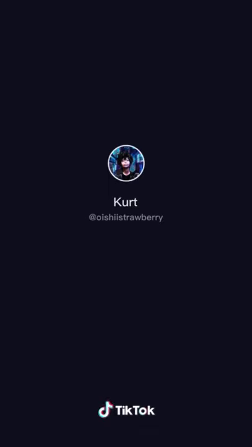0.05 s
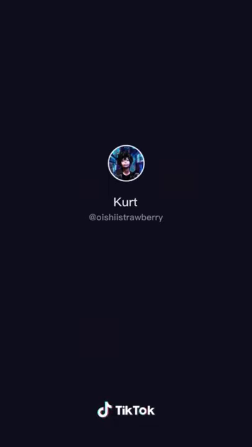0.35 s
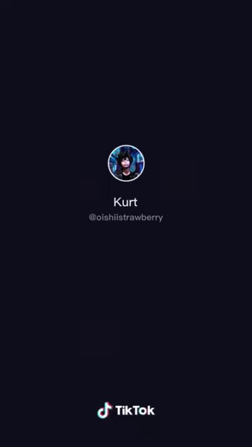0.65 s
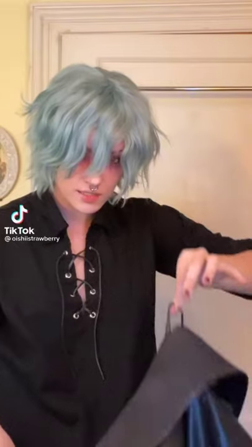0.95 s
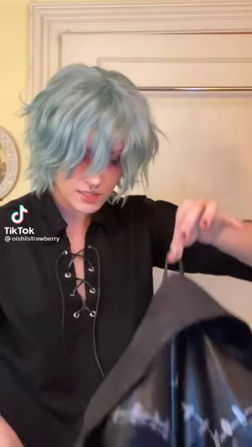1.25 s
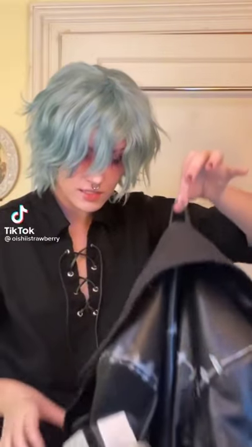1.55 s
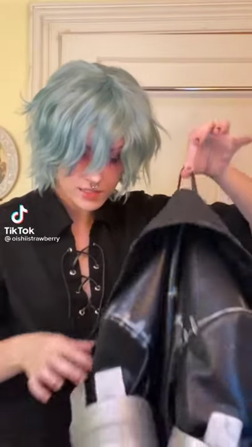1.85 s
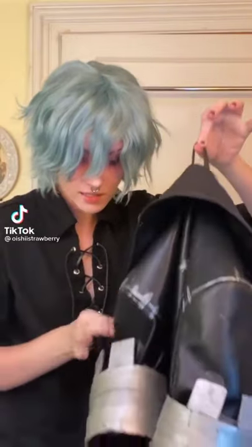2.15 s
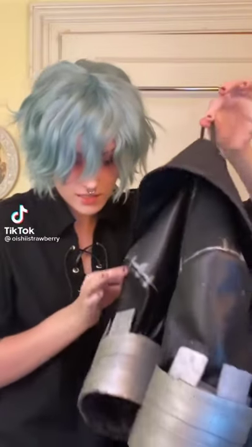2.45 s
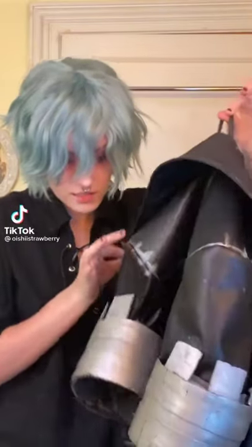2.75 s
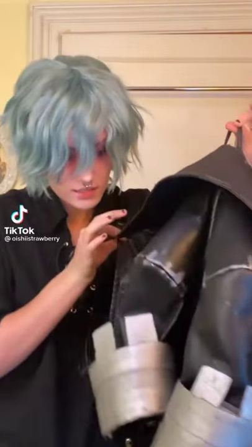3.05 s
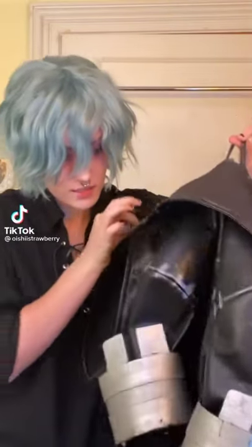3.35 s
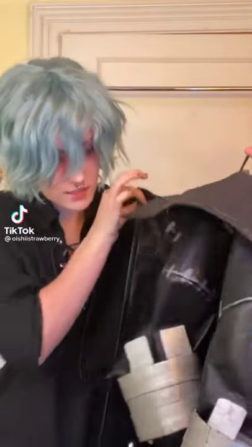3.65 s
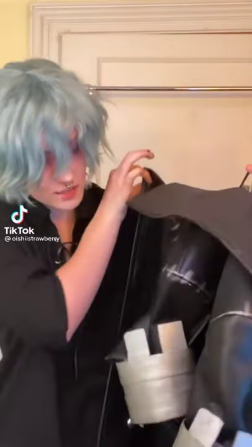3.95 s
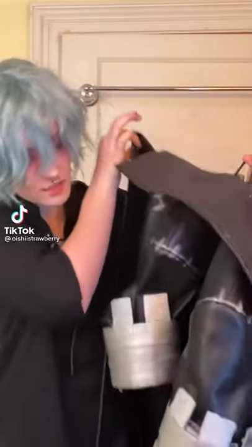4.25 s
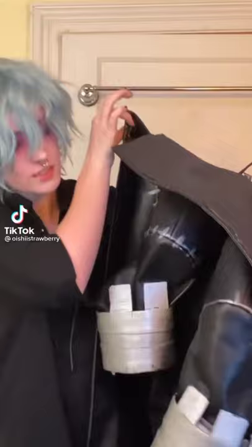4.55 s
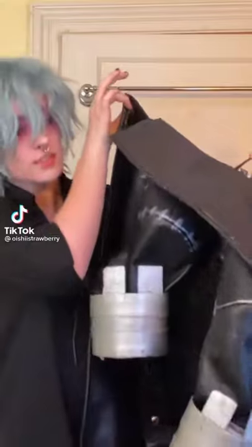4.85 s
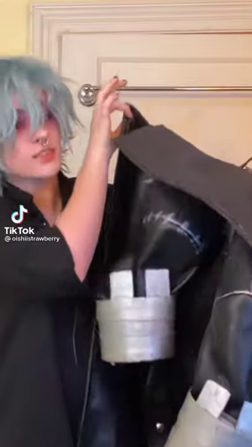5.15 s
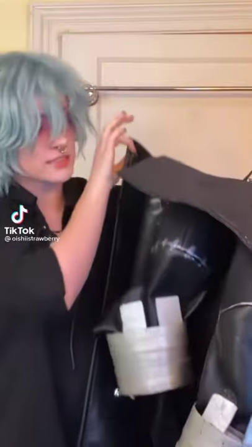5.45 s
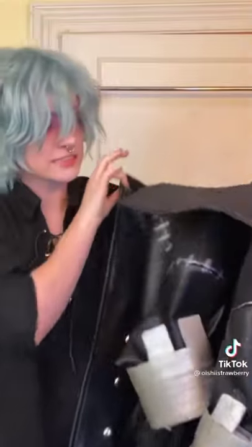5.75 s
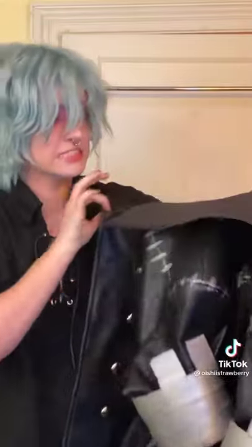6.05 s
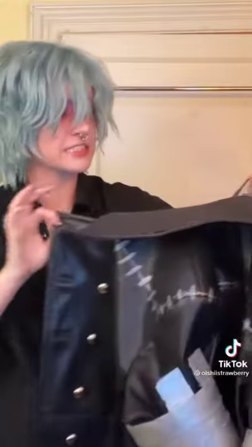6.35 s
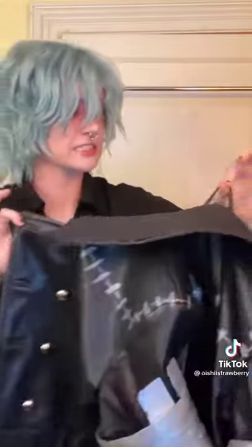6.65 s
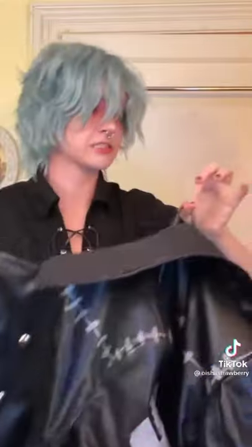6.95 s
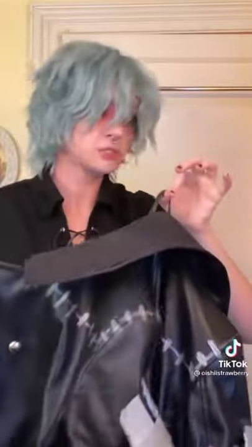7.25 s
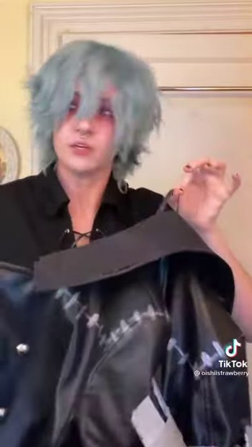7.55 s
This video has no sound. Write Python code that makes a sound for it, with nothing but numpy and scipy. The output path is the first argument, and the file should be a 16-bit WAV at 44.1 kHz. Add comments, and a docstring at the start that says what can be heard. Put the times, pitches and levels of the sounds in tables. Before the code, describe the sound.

After a brief silence and faint room rumble, a stiff coat is picked up with a heavy flap right by the microphone. Irregular dull flops and crisp snaps follow, mixed with clumps of crinkling and sliding hiss as the imitation leather is turned over. The handling becomes gentler toward the end until the coat settles. The room sounds small and fairly dry.

```python
"""A stiff imitation-leather coat on its hanger, close up in a small room. A faint room rumble fades in,
then at 0.84 s the coat is hoisted with a big dull flap and a hollow rumple. As it is turned about, large
panels flip over, taut creases snap and lesser panels buckle at random; between them the coated cloth
hisses as it slides over itself and tiny creases crackle. The rustle is brightest around 4 s, then
softens, and the coat settles with a last small flap near 7.4 s."""
import sys
import numpy as np
from scipy import signal
from scipy.fft import rfft, irfft
from scipy.io import wavfile
from scipy.ndimage import uniform_filter1d

SR = 44100
rng = np.random.default_rng(int(sys.argv[2]) if len(sys.argv) > 2 else 0)


def unload_audio(sound):
    """Save the sound as a 16-bit wav file, at the path given as the first command line argument."""
    columns = np.transpose(np.atleast_2d(sound))
    # keep every value between -1 and 1, then stretch to whole-number steps
    steps = np.round(np.clip(columns, -1, 1) * 32767)
    wavfile.write(sys.argv[1], SR, steps.astype(np.int16))


N = 335601
TIME = np.arange(N) / SR
GRAB_S, SETTLED_S = 0.84, 7.0  # the coat is taken up; its lesser panels stop buckling
HIT_SAMPLES, LEAD_S = 2048, 0.005  # length of one flap or snap; its pre-roll
HIT_TIME = TIME[:HIT_SAMPLES] - LEAD_S  # zero where the crease gives way

# Spectrum of the room bed, ahead of its fader: freq_hz, band_level_db
ROOM_SPECTRUM = [(25, -62), (50, -58.5), (200, -60.5), (6000, -73.5), (13000, -106)]
# Fader bringing the room bed in: time_s, gain_db
ROOM_FADE = [(.7, -120), (.76, -5.5), (.85, -3)]
# Stereo width of the coat: freq_hz, side_minus_mid_db
COAT_WIDTH = [(90, 0), (200, -14), (1000, -16), (2000, -12), (3500, -7.5), (6000, -3), (12000, -1.5)]
# Fader on the coat's treble above 11 kHz: time_s, gain_db
TREBLE_RIDE = [(1.0, -5.5), (1.7, -14), (2.1, -36), (2.6, 2), (3.6, 2.5), (4.8, 3), (5.7, -27), (7.5, -24)]
# Hollow swells as the coat is hoisted: time_s, level_db
RUMPLE_ENVELOPE = [(.84, -110), (.855, -21), (1.08, -41), (1.45, -25), (1.62, -60), (1.9, -110)]
# How hard the cloth slides and creases: time_s, body_db, hiss_db
RUSTLE_ENVELOPE = [(1.03, -37, -52), (1.36, -44, -41.5), (1.74, -37.5, -41), (2.13, -35, -40),
                   (2.45, -49, -51.5), (2.78, -46, -43.5), (3.02, -47, -49.5), (3.24, -40.5, -37.5),
                   (3.78, -35.5, -33.5), (3.96, -41, -38.5), (4.28, -35, -32), (4.65, -37.5, -39),
                   (5.02, -39, -41.5), (5.6, -39, -44), (5.97, -45, -51.5), (6.62, -43.5, -48),
                   (7.23, -54, -59.5), (7.6, -61.5, -63.5)]
# Tone of the rustle: freq_hz, band_gain_db
RUSTLE_EQ = [(86, -21.5), (200, -14), (300, -13.5), (500, -11), (1060, -10), (2000, -8.5), (3700, -4.5),
             (5600, -2), (13000, -5.5)]
# How the sheet radiates a flap or snap: freq_hz, gain_db
SHEET_EQ = [(130, 4.5), (200, 5.5), (330, 0), (520, -4), (750, 0.5), (1100, 5.5), (1500, 0.5), (3200, 1.85),
            (5600, 0.5), (8500, -4.5), (13000, -7)]
# Large panels flipping over, all dull: start_s, level_db, pitch_hz, crease_run_s
# (level is the hit's energy spread over 5 ms; pitch is the panel's lowest resonance)
PANEL_FLAPS = [(.847, -6.5, 224, 0.0032), (.859, -24, 370, 0.0024), (.875, -20, 390, 0.0019),
               (1.012, -15, 435, 0.0011), (1.023, -19, 290, 0.0038), (1.111, -18.5, 540, 0.0038),
               (1.125, -24, 457, 0.00084), (1.148, -19, 350, .004), (1.254, -19.5, 540, 0.014),
               (1.293, -17, 300, .005), (1.318, -10.5, 238, 0.0084), (1.370, -13.5, 320, 0.0036),
               (1.424, -23.5, 402, 0.0065), (1.443, -17, 412, 0.0044), (1.469, -18.5, 315, 0.0031),
               (1.520, -8, 350, 0.0062), (1.789, -15, 430, .013), (2.013, -14, 300, 0.0065),
               (2.024, -13.5, 356, 0.0018), (2.269, -19, 374, 0.0074), (2.456, -28, 318, 0.0042),
               (2.558, -25.5, 298, 0.0096), (2.813, -22.5, 584, 0.0016), (2.826, -10.5, 393, 0.0058),
               (2.975, -29, 395, 0.0025), (3.269, -27.5, 510, 0.0025), (3.086, -17, 295, 0.005),
               (3.133, -19.5, 440, 0.0054), (3.410, -18, 274, .013), (3.437, -15.5, 484, 0.0031),
               (3.470, -14.5, 290, 0.0081), (3.583, -22, 320, 0.016), (3.622, -12.5, 387, 0.0042),
               (4, -18.5, 617, 0.00042), (4.026, -17, 343, 0.0064), (4.115, -17, 386, 0.021),
               (4.168, -15, 513, .002), (4.252, -9.5, 275, 0.0049), (4.297, -21.5, 610, .0036),
               (4.397, -14, 520, .0015), (4.506, -22.5, 507, 0.004), (4.526, -23, 403, 0.0097),
               (4.893, -15.5, 197, 0.009), (5.103, -26.5, 550, 0.0015), (5.132, -24, 456, 0.006),
               (5.282, -26.5, 546, 0.0043), (5.467, -16.5, 405, 0.0019), (5.605, -24.5, 344, 0.0033),
               (5.752, -21, 390, 0.016), (5.956, -25.5, 416, 0.0076), (6.051, -33, 587, 0.0022),
               (6.41, -27.5, 467, 0.0026), (6.427, -21.5, 517, 0.0015), (6.755, -26.5, 480, .0035),
               (6.822, -31, 484, 0.004), (6.888, -24.5, 950, .003), (7.440, -36.5, 317, 0.0046)]
# Taut creases cracking, level and pitch as above: start_s, level_db, pitch_hz, tilt_db_per_octave
CREASE_SNAPS = [(0.906, -16.5, 457, 2), (.938, -12, 1220, -0.5), (1.002, -17.5, 316, 3),
                (1.078, -19.5, 630, 4.5), (1.222, -19.5, 370, 0), (1.248, -17, 800, 0.5),
                (1.561, -11, 1960, 8.5), (1.575, -21.5, 320, 2), (1.656, -17.5, 1700, 8),
                (1.690, -23, 1290, 3.5), (1.886, -26, 3050, 12), (1.717, -20, 2980, 16),
                (1.770, -21, 430, 7), (1.836, -23.5, 1710, -2), (1.868, -18, 1720, 3),
                (2.074, -24, 500, -0.5), (2.101, -22, 516, 0), (2.240, -27, 546, 1.5),
                (2.382, -25, 540, 5.5), (2.698, -21.5, 1940, 0), (3.094, -16, 300, 3.5),
                (3.224, -24, 400, 2), (3.242, -19.5, 900, 2), (3.315, -26.5, 4520, 11),
                (3.400, -16.5, 267, 4.5), (3.492, -17, 240, 4), (3.681, -19.5, 1400, 1),
                (3.765, -16.5, 1850, 5), (3.806, -12.5, 400, 4.5), (3.827, -21, 300, 3.5),
                (3.879, -17.5, 1510, 3), (3.944, -20.5, 1810, 6), (4.414, -23, 497, 3.5),
                (4.484, -28, 460, 10), (4.957, -26, 400, 3.5), (5.056, -26, 272, 3), (5.167, -31, 400, 0),
                (5.224, -29, 150, 6.5), (5.451, -24, 250, 0.5), (5.899, -30, 430, 3),
                (6.111, -30.5, 372, 1), (6.185, -31.5, 430, 0), (6.556, -29, 430, 0),
                (6.947, -33.5, 220, 2), (7.088, -23, 1480, 1.5)]


def from_db(db):
    """Decibels to gain."""
    return 10 ** (np.asarray(db) / 20)


def unit_energy(x):
    """Each row scaled to energy 1."""
    return x / np.sqrt(np.sum(x ** 2, axis=-1, keepdims=True) + 1e-20)


def unit_rms(x):
    """The whole signal scaled to rms 1."""
    return x / np.sqrt(np.mean(x ** 2) + 1e-20)


def automation(rows):
    """One curve, a value per sample, for each column after time_s."""
    time_s, *columns = np.transpose(rows)
    return [np.interp(TIME, time_s, column) for column in columns]


def at_hz(points, hz):
    """An EQ curve read on a log-frequency axis."""
    freq_hz, value = np.transpose(points)
    return np.interp(np.log(hz), np.log(freq_hz), value)


def band_pass(x, low_hz, high_hz):
    """A gentle causal band filter."""
    return signal.sosfilt(signal.butter(2, [low_hz, high_hz], "band", fs=SR, output="sos"), x + 1e-18)


def stereo(mid, side, side_db):
    """Left and right from mid and side at constant power."""
    width = from_db(side_db)
    return np.array([mid + width * side, mid - width * side]) / np.sqrt(1 + width ** 2)


def drift(rate_hz, hop=40):
    """Smooth random modulation of rms about 1."""
    pole = np.exp(-2 * np.pi * rate_hz * hop / SR)
    slow = signal.lfilter([1], [1, -2 * pole, pole * pole], rng.standard_normal(2 * N // hop))
    slow = unit_rms(slow[-N // hop:])
    return np.interp(np.arange(N) / hop, np.arange(len(slow)), slow)


def minimum_phase(magnitude):
    """A response with this magnitude in which nothing sounds before its cause."""
    cepstrum = irfft(np.log(magnitude + 1e-9))
    cepstrum[..., 1:] *= 2
    cepstrum[..., HIT_SAMPLES // 2:] = 0
    return np.exp(rfft(cepstrum))


def room_tone():
    """The bed: steady rumble and faint hiss in octave bands, faded in just before the grab."""
    edges_hz = np.geomspace(18, 16000, 11)
    white = rng.standard_normal((2, 2, N))
    bed = 0
    for k, (low, high) in enumerate(zip(edges_hz, edges_hz[1:])):
        band = unit_rms(band_pass(white[k % 2], low, high))
        bed = bed + band * from_db(at_hz(ROOM_SPECTRUM, np.sqrt(low * high)))
    return stereo(*bed, side_db=-4) * from_db(automation(ROOM_FADE)[0])


def wall_reflections(x, t60_s=0.13, send_db=-17, predelay_s=0.0076, low_hz=174, high_hz=6000):
    """Nearby walls return a weak, dense, short tail."""
    t = TIME[:SR // 2]
    decay = from_db(-60 * t / t60_s) * (t > predelay_s)
    echoes = band_pass(rng.standard_normal((2, len(t))) * decay, low_hz, high_hz)
    response = stereo(*unit_energy(echoes), side_db=-7) * np.sqrt(2 * high_hz / SR)
    return from_db(send_db) * signal.fftconvolve(x, response, axes=1)[:, :N]


def top_treble_fader(x, shelf_hz=11300):
    """The treble above 11 kHz dips near 2 s, is brightest from 2.6 to 4.8 s, then dulls."""
    below = signal.sosfiltfilt(signal.butter(2, shelf_hz, fs=SR, output="sos"), x)
    return below + (x - below) * from_db(automation(TREBLE_RIDE)[0])


def crease_ticks(per_s, spread_db):
    """Energy of creases giving way at random moments: mostly small, a few large; mean 1."""
    gives_way = rng.random(N) < per_s / SR
    energy = gives_way * from_db(spread_db * np.minimum(rng.exponential(1, N), 3.2)) ** 2
    return energy / energy.mean()


def rumple(low_hz=260, high_hz=540):
    """Broad soft folds knock hollowly over one another as the coat is hoisted."""
    knocks = np.sqrt(crease_ticks(per_s=150, spread_db=3)) * rng.choice([-1, 1], (2, N))
    mid, side = unit_rms(band_pass(knocks, low_hz, high_hz))
    return stereo(mid, side, at_hz(COAT_WIDTH, low_hz)) * from_db(automation(RUMPLE_ENVELOPE)[0])


def rustle(ticks_per_s=520, spread_db=9.0, tick_s=0.00086, tick_cycles=0.12, attack_s=0.022,
           slide_db=-9.5, crackle_db=-0.5, catch_db=2.0, patchy_db=2.0, body_hz=1300, hiss_hz=4000):
    """Sliding hiss with crease crackle on it; the cloth catches and lets go, so both come in clumps."""
    attack_db = 20 * np.log10(np.clip((TIME - GRAB_S) / attack_s, 1e-6, 1))
    body_db, hiss_db = automation(RUSTLE_ENVELOPE) + attack_db
    broad_ticks = crease_ticks(ticks_per_s, spread_db)
    low_ticks = crease_ticks(ticks_per_s / 2, spread_db)
    high_ticks = crease_ticks(ticks_per_s / 2, spread_db)
    clumps_db = catch_db * drift(rate_hz=25)
    edges_hz = np.geomspace(70, 16000, 14)
    white = rng.standard_normal((2, 2, N))
    out = 0
    for k, (low, high) in enumerate(zip(edges_hz, edges_hz[1:])):
        hz = np.sqrt(low * high)
        blend = np.clip(np.log(hz / body_hz) / np.log(hiss_hz / body_hz), 0, 1)  # 0 body, 1 hiss
        ticks = (broad_ticks + (1 - blend) * low_ticks + blend * high_ticks) / 2
        release = np.exp(-1 / (SR * (tick_s + tick_cycles / hz)))  # low bands hang on longer
        crackle = signal.lfilter([1 - release], [1, -release], ticks + 1e-18)
        grain = np.sqrt(from_db(slide_db) ** 2 + from_db(crackle_db) ** 2 * crackle)
        mid, side = unit_rms(band_pass(white[k % 2] * grain, low, high)) * np.sqrt(np.mean(grain ** 2))
        level_db = (1 - blend) * body_db + blend * hiss_db + clumps_db + at_hz(RUSTLE_EQ, hz)
        flicker_db = patchy_db * drift(rate_hz=13.7)
        out = out + stereo(mid, side, at_hz(COAT_WIDTH, hz)) * from_db(level_db + flicker_db)
    return out


def crease_force(run_s, jerk_db=5.0, kick_db=-4.0, creep_db=-20.5, creep_s=0.0025):
    """Mid and side force of each crease: it creeps, gives way with a kick, then runs out in jerks."""
    count, after = len(run_s), HIT_TIME >= 0
    jerks = unit_rms(uniform_filter1d(rng.standard_normal((count, HIT_SAMPLES)), size=20))
    run = unit_energy(after * np.exp(-np.abs(HIT_TIME) / run_s))
    # a slow crease creeps audibly first, a quick one cracks without warning
    lead_in = unit_energy(~after * np.exp(-np.abs(HIT_TIME) / creep_s))
    creep = from_db(creep_db) * (run_s / run_s.mean()) * lead_in
    envelope = unit_energy((creep + run) * from_db(jerk_db * jerks))
    force = envelope * rng.standard_normal((count, 2, HIT_SAMPLES)).swapaxes(0, 1)
    force[:, :, np.argmax(after)] += from_db(kick_db) * rng.standard_normal((count, 2)).T
    return force


def panel_flutter(count, hz, gain_db=-3.5, decay_s=0.0065, below_hz=460):
    """Spectrum of the slow bending waves that keep each panel shaking after the hit."""
    envelope = unit_energy((HIT_TIME > 0) * np.exp(-np.abs(HIT_TIME) / decay_s))
    shake = envelope * rng.standard_normal((count, 2, HIT_SAMPLES)).swapaxes(0, 1)
    return from_db(gain_db) * rfft(shake) / (1 + 1j * hz / below_hz) ** 2


def panel_tone(hz, pitch_hz, tilt, ripple_db=2.0):
    """A panel radiates little below its lowest resonance and has random modes of its own."""
    ratio = hz / pitch_hz
    q = 1.58 * (pitch_hz / 500) ** 0.45  # small taut panels ring more clearly
    resonance = ratio ** 2 / np.hypot(1 - ratio ** 2, ratio / q)
    modes = unit_rms(uniform_filter1d(rng.standard_normal(ratio.shape), size=10, mode="wrap"))
    eq_db = tilt * np.log2(np.maximum(ratio, 1)) + at_hz(SHEET_EQ, hz) + ripple_db * modes
    return resonance * from_db(eq_db) / np.sqrt(hz)


def small_buckles(count=72, base_db=-32, effort_follow=0.56):
    """Cues for lesser panels buckling at chance moments, harder the more the cloth moves."""
    strength, pitch, bright, slow, late = np.clip(rng.standard_normal((count, 5)), -2, 2).T
    start_s = np.interp(np.arange(count) + late, [-2, count + 1], [GRAB_S, SETTLED_S])
    time_s, body_db, hiss_db = np.transpose(RUSTLE_ENVELOPE)
    effort_db = np.interp(start_s, time_s, (body_db + hiss_db) / 2)
    level_db = base_db + effort_follow * (effort_db - effort_db.mean()) + 1.5 * strength
    pitch_hz = 430 * 2 ** (0.3 * pitch)
    tilt = 2.0 + 2.0 * bright
    run_s = 0.0016 * 2 ** (0.52 * slow)
    return np.transpose([start_s, level_db, pitch_hz, tilt, run_s])


def snaps(run_s=0.0017):
    """Cues for taut creases, which all crack in one quick run."""
    return [(*snap, run_s) for snap in CREASE_SNAPS]


def flaps(mean_tilt=-1.2, dulling_per_db=0.054):
    """Cues for large panels flipping over: the heavier the flap, the duller."""
    mean_db = np.mean(PANEL_FLAPS, axis=0)[1]
    return [(start_s, level_db, pitch_hz, mean_tilt - dulling_per_db * (level_db - mean_db), run_s)
            for start_s, level_db, pitch_hz, run_s in PANEL_FLAPS]


def panel_hits(cues, decay_per_run=0.72, travel_s=0.000599, trim_db=0.12, pan_spread_db=0.85):
    """One hit per cue: a crease runs, its panel flips over and rings for a few cycles."""
    start_s, level_db, pitch_hz, tilt, run_s = cues.T[:, :, None]  # tilt: dB per octave above the pitch
    hz = np.maximum(np.arange(HIT_SAMPLES // 2 + 1) * SR / HIT_SAMPLES, 10)
    tone = panel_tone(hz, pitch_hz, tilt)
    force = rfft(crease_force(decay_per_run * run_s)) + panel_flutter(len(cues), hz)
    # the force is evened out over each octave, so the panel sets the colour
    octave = np.exp(-2 * (2 * np.log2(hz[:, None] / hz)) ** 2) / hz[:, None]
    force_contour = np.sqrt(np.abs(force) ** 2 @ (octave / octave.sum(0)))
    # low bending waves travel slower; travel_s is the delay at 500 Hz
    dispersion = np.exp(-4j * np.pi * travel_s * np.sqrt(hz * 500))
    mid, side = force * minimum_phase(tone / force_contour) * dispersion
    hits = irfft(stereo(mid, side, at_hz(COAT_WIDTH, hz)))
    pan_db = pan_spread_db * rng.standard_normal(len(cues))
    hits *= from_db(np.outer([-0.5, 0.5], pan_db))[:, :, None]
    hits /= np.sqrt(np.sum(hits ** 2, axis=-1, keepdims=True).mean(0))
    hits *= from_db(level_db + trim_db) * np.sqrt(0.005 * SR)  # the energy of 5 ms at this level
    out = np.zeros((2, N))
    for i, start in enumerate(((start_s[:, 0] - LEAD_S) * SR).astype(int)):
        out[:, start:start + HIT_SAMPLES] += hits[:, i, :N - start]
    return out


def scene():
    """The coat up front, the room behind it."""
    cues = np.vstack([flaps(), snaps(), small_buckles()])
    coat = top_treble_fader(panel_hits(cues) + rustle() + rumple())
    return coat + wall_reflections(coat) + room_tone()


def record(dry, ceiling=0.78, cutoff_hz=15300):
    """Soft clipping rounds the tallest peaks, then a steep low-pass cuts the top."""
    low_pass = signal.ellip(10, 0.1, 90, cutoff_hz, fs=SR, output="sos")
    return signal.sosfilt(low_pass, ceiling * np.tanh(dry / ceiling))


dry = scene()
out = record(dry)
unload_audio(out)
```